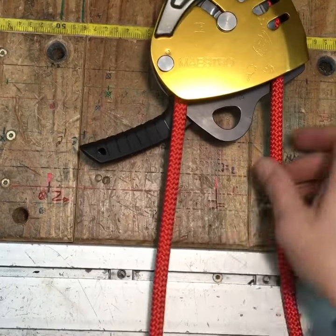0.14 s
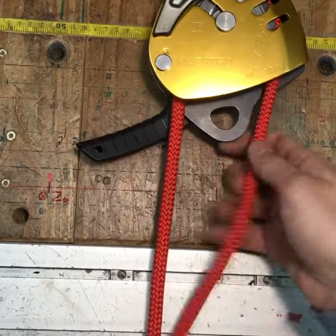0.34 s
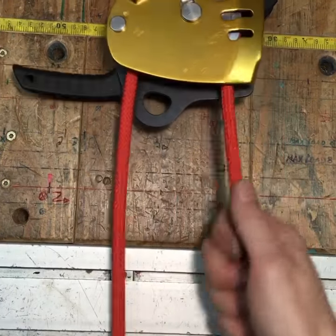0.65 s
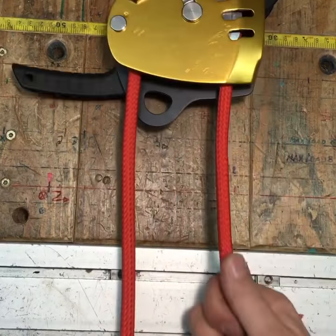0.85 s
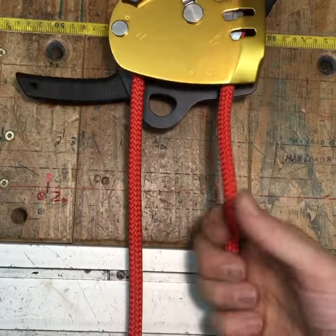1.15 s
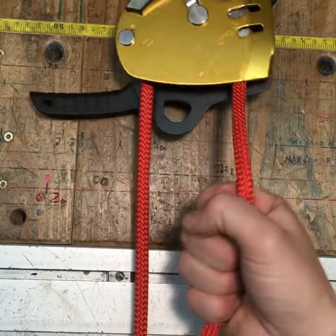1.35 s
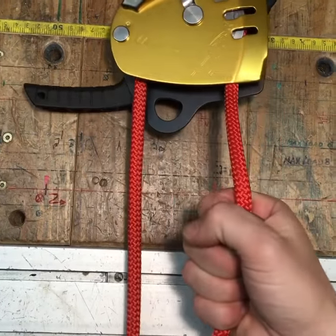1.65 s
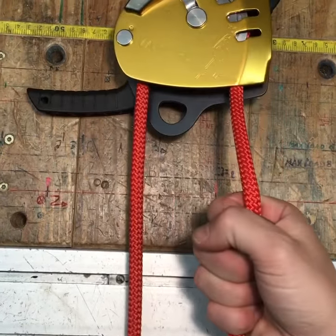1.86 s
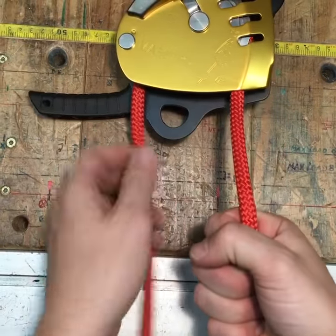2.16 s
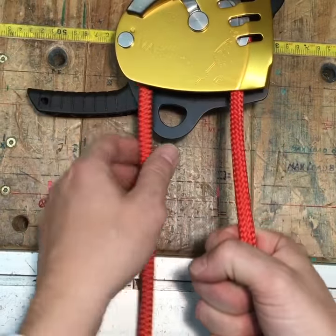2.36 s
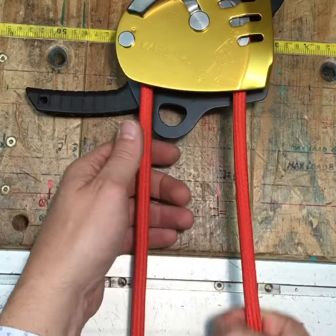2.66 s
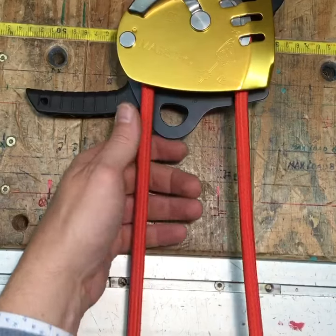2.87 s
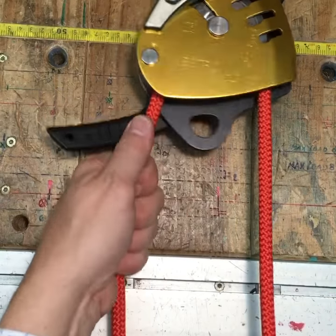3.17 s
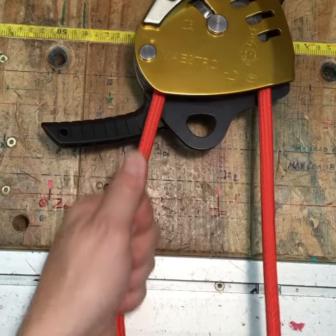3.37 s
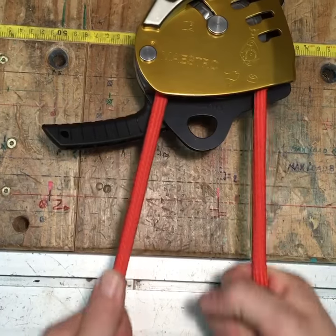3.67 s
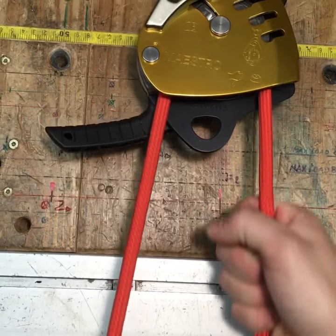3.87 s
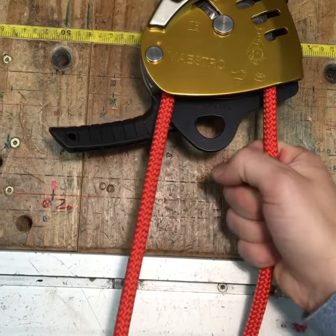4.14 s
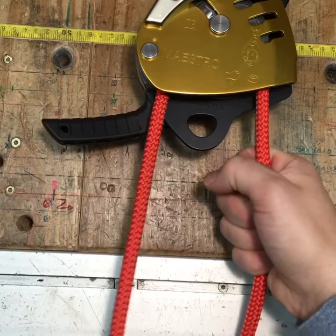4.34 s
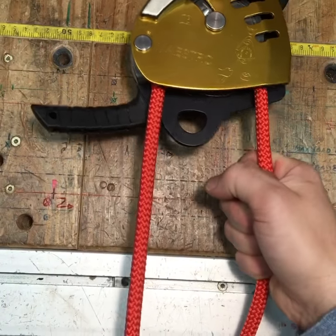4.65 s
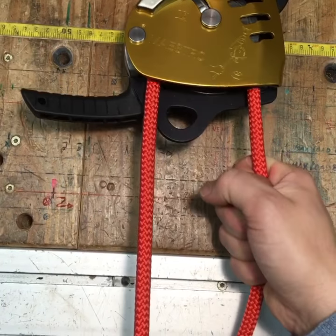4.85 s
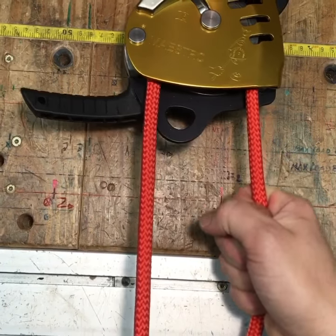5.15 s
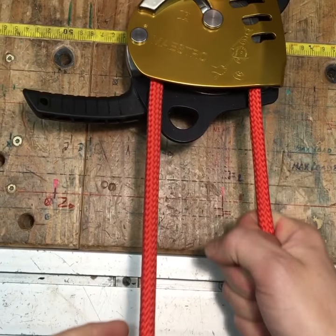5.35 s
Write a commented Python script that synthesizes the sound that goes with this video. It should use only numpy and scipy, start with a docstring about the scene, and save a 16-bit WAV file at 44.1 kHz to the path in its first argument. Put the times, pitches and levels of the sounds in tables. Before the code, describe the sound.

A metal rope pulley knocks sharply on a wooden bench, then one long pull sets its ratchet clicking in a bright, fast whirr, then near quiet.

```python
"""Rope through a ratchet pulley

A rope is worked through an aluminium pulley device lying on a wooden workbench, heard from close by.
Knocks ring tuned modes of bench, housing and side plate; noise bursts add the clacks, and rubs the friction.
One long haul spins the sheave: its pawl snaps over the teeth in a bright whirr, one noise-driven click a tooth.
Shaped noise makes the faint hiss of the sliding rope, and the air and low rumble of the workshop behind it.
"""
import sys
import numpy as np
from scipy import signal
from scipy.fft import rfft, irfft
from scipy.io import wavfile
from scipy.ndimage import uniform_filter1d

SR = 44100
rng = np.random.default_rng(int(sys.argv[2]) if len(sys.argv) > 2 else 0)


def unload_audio(sound):
    """Save the sound as a 16-bit wav file, at the path given as the first command line argument."""
    columns = np.transpose(np.atleast_2d(sound))
    # keep every value between -1 and 1, then stretch to whole-number steps
    steps = np.round(np.clip(columns, -1, 1) * 32767)
    wavfile.write(sys.argv[1], SR, steps.astype(np.int16))


N = 242991
TIME = np.arange(N) / SR
AFTER = TIME[:SR // 3]   # time since a blow, s

# Levels are in dB; the bench, plate, tick, slide and rumble levels are raised or lowered
# by settings in scene().

# the device knocks and settles: [t/s, bench thump level/dB, housing clack level/dB,
# side plate level/dB, steel tick level/dB, landing f/Hz]
KNOCKS = [(0.309, -46.5, -58, -75.5, -80, 1400), (0.345, -61, -71, -75, -52, 2000),
          (0.3785, -56, -21, -32.5, -30.5, 1700), (0.3827, -44.5, -24.5, -28, -45, 1050),
          (0.774, -54, -47.5, -49, -72, 1700), (0.8077, -35, -36, -49, -59, 1340),
          (1.16, -43, -50, -72, -61.5, 1500), (1.191, -49, -52.5, -62.5, -48.5, 1700),
          (1.2202, -28.5, -23, -21, -31, 1800), (1.3566, -36.5, -39, -53, -66, 1590),
          (1.958, -65, -57, -45, -69, 2000), (2.121, -52, -64, -85, -82, 800),
          (2.912, -39.5, -47.5, -65, -61, 1800), (2.943, -38, -40, -42, -37, 2000),
          (2.9501, -29.5, -21.5, -36.5, -32.5, 1140), (2.974, -34.5, -34.5, -46.5, -57.5, 1700),
          (4.2578, -42, -32, -36, -41, 800), (4.595, -75, -59.5, -59.5, -56.5, 2000),
          (4.612, -59, -55.5, -57, -57.5, 2000), (4.659, -61.5, -61.5, -63, -62, 2010)]
# modes of the wooden bench top, also nudged by the ratchet: [f/Hz, level/dB, t60/s]
BENCH_MODES = [(59.6, -10.5, .22), (92.2, -9, .2), (151.5, -9, 0.075), (178, -3, 0.09), (211.6, -2.5, 0.13),
               (254.7, -6.5, 0.092), (312, -19, 0.15), (392, -18.5, 0.15)]
# ringing modes of the side plate: [f/Hz, level/dB, t60/s]
PLATE_MODES = [(3160, -14, .02), (3580, -5.5, 0.033), (3657, -3, 0.036), (3617, -11.5, 0.017)]
# spectrum of the side plate's snap: [f/Hz, level/dB per Hz]
PLATE_COLOUR = [(2000, -22), (3100, -24), (3500, 8), (3850, 3), (4400, -20.5), (6000, -19), (12000, -38)]
# spectrum of the steel tick: [f/Hz, level/dB per Hz]
TICK_COLOUR = [(1500, -13), (4500, -6), (5800, 1), (6800, 3.5), (8000, -9.5), (9600, 4.5), (10600, -9),
               (13000, 1), (15500, -8)]
# an edge touches first, with a weaker body, then the device rocks flat
ROCK_S, EDGE_HZ, EDGE_DB = .003, 2000, -7
# the bench thumps once more on the rebound
REBOUND_S, REBOUND_DB = .03, -12


def knocks(swell_s, contact_s, thump_db, plate_db, plate_snap_db, tick_db, landing_db):
    """An edge touches, then the device lands flat: metal answers at once, the heavy bench swings later."""
    out = np.zeros(N)
    edge = (0, EDGE_HZ, EDGE_DB, 0)
    for s, bench, housing, plate, tick, landing_hz in KNOCKS:
        landing = (ROCK_S, landing_hz, 0, landing_db)
        for delay, hz, body_db, bright_db in (edge, landing):
            plate_ring = struck(PLATE_MODES, spread_db=0.0)
            plate_snap = snap(PLATE_COLOUR, crack_t60=0.016, ring_db=-18.0, ring_t60=0.062)
            steel_tick = snap(TICK_COLOUR, crack_t60=0.014, ring_db=-15, ring_t60=0.091)
            bright = from_db(plate + plate_db) * plate_ring
            bright += from_db(plate + plate_snap_db) * plate_snap
            bright += from_db(tick + tick_db) * steel_tick
            body = contact(housing + body_db, hz, focus_db=5.0, modes_db=-0.5, clack_db=2.5)
            add(out, s + delay, (body + from_db(bright_db) * bright) * rising(contact_s))
        for delay, db in ((0, 0), (REBOUND_S, REBOUND_DB)):
            thump = struck(BENCH_MODES, spread_db=1.5) * rising(swell_s)
            add(out, s + ROCK_S + delay, from_db(bench + thump_db + db) * thump)
    return out


# ringing modes of the aluminium housing: [f/Hz, level/dB, t60/s]
HOUSING_MODES = [(395, -15.5, .13), (585, -15.5, 0.082), (654, -15, 0.12), (716, -11.5, 0.12),
                 (970, -10, .04), (1087.6, -5.5, 0.064), (1177, -14.5, 0.027), (1285, -6.5, 0.066),
                 (1418, -13.5, 0.034), (1684, -10.5, 0.034), (1776, -3, 0.039), (1990, -5.5, 0.035),
                 (2362, -7, .022), (2614, -10, .03)]
# spectrum of the housing's clack: [f/Hz, level/dB per Hz]
CLACK_COLOUR = [(300, -14.5), (500, -19.5), (680, -3), (820, -9), (1100, 0.5), (1900, 0.5), (2700, -4.5),
                (3100, -14), (3700, -10), (4600, -23), (9000, -24)]


def contact(level_db, hz, focus_db, modes_db, clack_db):
    """A contact drives the housing best near its own pitch, focus_db less for each octave away."""
    def favour(f):
        return from_db(-focus_db * np.abs(np.log2((f + 1) / hz)))

    ring = struck(HOUSING_MODES, spread_db=1.5, gain_at=favour)
    clack = snap(CLACK_COLOUR, crack_t60=0.016, ring_db=-15, ring_t60=.1, gain_at=favour)
    return from_db(level_db) * (from_db(modes_db) * ring + from_db(clack_db) * clack)


# hand, rope or device rubs briefly: [t/s, length/s, level/dB, centre f/Hz]
RUBS = [(0.0, 0.042, -50.5, 410), (.825, .075, -61.5, 12500), (0.889, 0.041, -67, 590),
        (1.092, 0.063, -57, 760), (1.148, 0.066, -62, 1490), (1.777, 0.074, -57, 225),
        (1.84, 0.021, -55, 790), (2.903, 0.074, -48, 1490), (2.916, 0.029, -49.5, 11570),
        (4.39, 0.063, -64, 1000), (4.39, 0.075, -58, 300)]


def rubs(grain_db, width_share):
    """Each rub swells and fades, a grainy friction noise around its own pitch."""
    out = np.zeros(N)
    for s, length, db, hz in RUBS:
        size = int(length * SR)
        friction = rng.standard_normal(size) * grains(grain_db, size=size)
        width = width_share * hz
        focused = resonance(resonance(friction, hz, width), hz, width)
        swell = np.hanning(size) ** .5
        add(out, s, from_db(db) * swell * rms_one(focused))
    return out


# speed of the sheave during the long haul: [t/s, teeth per s]
SPEED = [(3.1874, 17.5), (3.25, 41.2), (3.385, 52.8), (3.44, 47.7), (3.62, 49.2), (3.68, 41.7),
         (3.84, 32.2), (4.02, 26.9)]
# click level; strong and weak teeth alternate by UNEVEN_DB up and down, and vary by chance
TOOTH_DB, UNEVEN_DB, TOOTH_SPREAD_DB = -11.6, 1.3, 1.0
EASING_DB_PER_S = 2.4   # the clicks soften as the haul runs out
# share of teeth on which the pawl bounces, typical delay of the second click, how much weaker it is
BOUNCE_SHARE, BOUNCE_S, BOUNCE_DB = .3, .009, -7


def ratchet(lead_s, lift_db, bench_db, scrape_db, scrape_grain_db):
    """The pawl scrapes up each tooth and snaps down, nudging the bench; now and then it bounces."""
    times, rates = np.transpose(SPEED)
    speed = np.interp(TIME, times, rates, left=0, right=0)
    teeth_passed = np.ceil(np.cumsum(speed) / SR)
    tooth_times = np.flatnonzero(np.diff(teeth_passed)) / SR
    out = np.zeros(N)
    for k, s in enumerate(tooth_times):
        db = TOOTH_DB - EASING_DB_PER_S * (s - times[0])
        db += UNEVEN_DB * (-1) ** k + TOOTH_SPREAD_DB * rng.standard_normal()
        early, late = rng.uniform(.6, 1.4, 2)   # loose timing of lift and bounce
        click = from_db(db) * pawl_click() * rising(0.00022)
        lift = from_db(db + lift_db) * noise(PAWL_COLOUR, size=len(AFTER)) * dying(0.0078)
        nudge = from_db(db + bench_db) * struck(BENCH_MODES, spread_db=2.0)
        add(out, s - lead_s * early, lift)
        add(out, s + 0.0005, click + nudge)
        if rng.random() < BOUNCE_SHARE:
            add(out, s + BOUNCE_S * late, from_db(BOUNCE_DB) * click)
    # the faster the teeth pass, the louder the scraping
    loudness = from_db(scrape_db) * (speed / rates.max()) ** 2
    return out + loudness * grains(scrape_grain_db, size=N) * noise(PAWL_COLOUR, size=N)


# spectrum of the steel pawl, also of its scraping: [f/Hz, level/dB per Hz]
PAWL_COLOUR = [(200, -10), (500, -31), (660, -10.5), (900, -33), (1600, -11.5), (2300, -13), (3000, -31),
               (4400, -14.5), (5500, -5), (8000, -4), (9300, 1), (11500, -2), (14500, 6), (16000, -11.5)]
# resonances of the sheave and its case under the pawl: [f/Hz, width/Hz, level/dB]
SHEAVE_MODES = [(1290, 70, -1), (1780, 250, -5), (2420, 130, -1), (3700, 230, 6), (4690, 60, -6),
                (5750, 250, -1), (6250, 100, -1), (7110, 260, 3), (7550, 80, 4), (8420, 90, 3),
                (9780, 190, 8), (12630, 80, 4), (13200, 300, 3), (13950, 220, 6), (14400, 80, 5),
                (14850, 250, 7)]


def pawl_click(steel_db=-9.5, sheave_db=-9, sheave_t60=.04, spread_db=1.5):
    """The steel pawl cracks and shakes the sheave, whose resonances answer a little differently each time."""
    shake = rng.standard_normal(len(AFTER)) * dying(sheave_t60)
    shake = signal.sosfilt(signal.butter(6, 1150, "high", fs=SR, output="sos"), shake)
    sheave = 0
    for hz, width, db in SHEAVE_MODES:
        sheave = sheave + from_db(db + rng.normal(0, spread_db)) * resonance(shake, hz, width)
    steel = snap(PAWL_COLOUR, crack_t60=0.013, ring_db=-6.5, ring_t60=0.044)
    return from_db(steel_db) * steel + from_db(sheave_db) * sheave


# rope slides through the device or a hand:
# [t/s, length/s, hiss level/dB, brightness/dB per octave, hand scuff level/dB]
SLIDES = [(0.0, .15, -59, 3, -66.5), (0.219, 0.66, -63, -0.5, -69.5), (1.101, 0.17, -65, 1.5, -67),
          (1.77, .18, -59.5, 2, -71), (2.17, .66, -63, -0.5, -77), (4.03, 0.38, -64.5, 1.5, -77),
          (4.88, 0.79, -66.5, -1.5, -80)]
# spectrum of the braid's hiss, also of the background hiss: [f/Hz, level/dB per Hz]
ROPE_COLOUR = [(530, -33.5), (900, -14.5), (1310, -1), (1490, -8.5), (1790, -2), (2140, -6.5), (2390, -1.5),
               (2930, -4), (3680, -2.5), (5040, -8.5), (6560, -3.5), (7680, -7), (12400, -4), (16000, -9)]
# spectrum of the hand's scuff, also of the dull room noise: [f/Hz, level/dB per Hz]
SCUFF_COLOUR = [(200, -19), (350, 1.5), (600, 1.5), (1200, -2), (2000, -15.5), (4000, -27)]
SLIDE_ATTACK_S, SLIDE_RELEASE_S = 0.048, 0.073   # the rope gathers speed and comes to rest


def slides(grain_db, hiss_db, scuff_db):
    """The braid hisses as it slides, grainy where its fibres catch; the hand that leads it scuffs softly."""
    out, t = np.zeros(N), TIME[:2 * SR]
    for s, length, hiss, brightness, scuff in SLIDES:
        def tilt(hz):
            return from_db(brightness * np.log2(hz + 1))

        start = 1 - np.exp(-t / SLIDE_ATTACK_S)
        stop = np.exp(-np.maximum(t - length, 0) / SLIDE_RELEASE_S)
        braid = from_db(hiss + hiss_db) * noise(ROPE_COLOUR, size=len(t), gain_at=tilt)
        hand = from_db(scuff + scuff_db) * noise(SCUFF_COLOUR, size=len(t))
        add(out, s, start * stop * (braid + hand))
    return out * grains(grain_db, size=N)


def after_hum(start_s, hz, level_db, t60):
    """Something on the bench hums on after a hard knock, as one slowly decaying sine."""
    t = np.maximum(TIME - start_s, 0)
    return from_db(level_db) * np.sin(2 * np.pi * hz * t) * np.exp(-np.log(1000) * t / t60)


# low rumble in the workshop: [t/s, level/dB]
RUMBLE = [(0.0, -66), (0.63, -60), (1.18, -61.5), (1.32, -53.5), (1.47, -62.5), (3.37, -58), (4.41, -60),
          (4.82, -66.5), (5.5, -61)]
# spectrum of the rumble: [f/Hz, level/dB per Hz]
RUMBLE_COLOUR = [(13, -40), (22, -8.5), (81, 0), (104, -9), (119, -14), (150, -12.5), (206, -11),
                 (297, -20.5), (402, -21), (450, -28), (580, -59.5), (990, -120)]


def background(hiss_db, murk_db, rumble_db):
    """A faint steady hiss and dull room noise over a low rumble that swells and sinks."""
    rumble, = in_time(RUMBLE)
    hiss = from_db(hiss_db) * noise(ROPE_COLOUR, size=N)
    murk = from_db(murk_db) * noise(SCUFF_COLOUR, size=N)
    return hiss + murk + from_db(rumble + rumble_db) * noise(RUMBLE_COLOUR, size=N)


# decay of the workshop's diffuse tail: [f/Hz, t60/s]
SHOP_T60 = [(100, 0.51), (600, 0.4), (2000, 0.28), (6000, 0.25), (15000, 0.06)]


def workshop(x, near_db, near_t60, tail_db):
    """Quick reflections from the bench and things near it, then a short tail that dulls as it dies."""
    edges = np.geomspace(60, 16000, 9)   # band edges, Hz
    white, tail = rng.standard_normal(len(AFTER)), 0
    for low, high in zip(edges, edges[1:]):
        band = signal.sosfilt(signal.butter(2, [low, high], "band", fs=SR, output="sos"), white)
        tail = tail + band * dying(at_hz(SHOP_T60, np.sqrt(low * high)))
    near = rng.standard_normal(len(AFTER)) * dying(near_t60) * (AFTER > .002)
    echo = from_db(near_db) * rms_one(near) + from_db(tail_db) * rms_one(tail * (AFTER > .008))
    return x + signal.fftconvolve(x, echo / np.sqrt(len(AFTER)))[:N]


def struck(modes, spread_db, gain_at=np.ones_like):
    """One blow: each mode rings with a chance strength and sign, as if struck in a new place."""
    hz, db, t60 = np.transpose(modes)
    strength = from_db(db + rng.normal(0, spread_db, len(hz)))
    sizes = gain_at(hz) * strength * rng.choice([-1, 1], len(hz))
    return sizes @ (np.sin(2 * np.pi * hz[:, None] * AFTER) * dying(t60[:, None]))


def snap(colour, crack_t60, ring_db, ring_t60, gain_at=np.ones_like):
    """Hard contact on crowded modes: a short crack and a weaker, longer ring of noise."""
    envelope = dying(crack_t60) + from_db(ring_db) * dying(ring_t60)
    return noise(colour, size=len(AFTER), gain_at=gain_at) * envelope


def resonance(x, hz, width):
    """Two-pole resonance with gain 1 on top."""
    r = np.exp(-np.pi * width / SR)
    feedforward = np.array([1, 0, -1]) * (1 - r * r) / 2
    feedback = [1, -2 * r * np.cos(2 * np.pi * hz / SR), r * r]
    return signal.lfilter(feedforward, feedback, x + 1e-18)


def noise(colour, size, gain_at=np.ones_like):
    """Noise of rms 1 with a given spectrum, falling away below its lowest point."""
    hz = np.fft.rfftfreq(size, 1 / SR)
    gain = gain_at(hz) * from_db(at_hz(colour, hz))
    gain = gain * np.minimum(hz / colour[0][0], 1) ** 2
    return rms_one(irfft(rfft(rng.standard_normal(size)) * gain, size))


def grains(depth_db, size):
    """Gain that flickers within milliseconds, as rough surfaces catch and slip."""
    return from_db(depth_db * rms_one(uniform_filter1d(rng.standard_normal(size), size=90)))


def rising(seconds):
    """Envelope of a vibration that builds up while the contact lasts."""
    return 1 - np.exp(-AFTER / seconds)


def dying(t60):
    """Envelope that falls 60 dB in t60 seconds."""
    return np.exp(-np.log(1000) * AFTER / t60)


def add(track, s, sound):
    """Mix a sound into a track from time s on."""
    start = max(round(s * SR), 0)
    track[start:start + len(sound)] += sound[:max(N - start, 0)]


def from_db(db):
    """Amplitude factor of a level in dB."""
    return 10 ** (np.asarray(db) / 20)


def rms_one(x):
    """Scale a signal to rms 1."""
    return x / np.sqrt(np.mean(x ** 2) + 1e-20)


def in_time(rows):
    """Draw each column of a timed table as a line over the whole scene."""
    s, *columns = np.transpose(rows)
    return [np.interp(TIME, s, c) for c in columns]


def at_hz(points, hz):
    """Read a curve at any frequency, on a logarithmic frequency axis."""
    table_hz, values = np.transpose(points)
    return np.interp(np.log(hz + 1e-9), np.log(table_hz), values)


def scene():
    """Knocks, rubs and the whirr sound in the workshop, over the sliding rope and the background."""
    device = knocks(swell_s=0.0036, contact_s=0.00061, thump_db=5.5, plate_db=-4.5,
                    plate_snap_db=1, tick_db=4.5, landing_db=-2)
    device += rubs(grain_db=2.5, width_share=0.83)
    whirr = ratchet(lead_s=0.0026, lift_db=-20.5, bench_db=-50, scrape_db=-43.5, scrape_grain_db=5)
    quiet = slides(grain_db=1.32, hiss_db=-0.35, scuff_db=1.5)
    quiet += after_hum(start_s=1.22, hz=159.2, level_db=-56, t60=8.2)
    quiet += background(hiss_db=-69.5, murk_db=-78.5, rumble_db=1.0)
    device = workshop(device, near_db=-14.5, near_t60=0.079, tail_db=-20.5)
    whirr = workshop(whirr, near_db=-12.5, near_t60=0.059, tail_db=-17.5)
    return (device + whirr + quiet)[None]


CUTOFF_HZ = 15700


def record(dry):
    """A steep elliptic low-pass cuts the top."""
    return signal.sosfilt(signal.ellip(10, .3, 70, CUTOFF_HZ, fs=SR, output="sos"), dry)


dry = scene()
out = record(dry)
unload_audio(out)
```